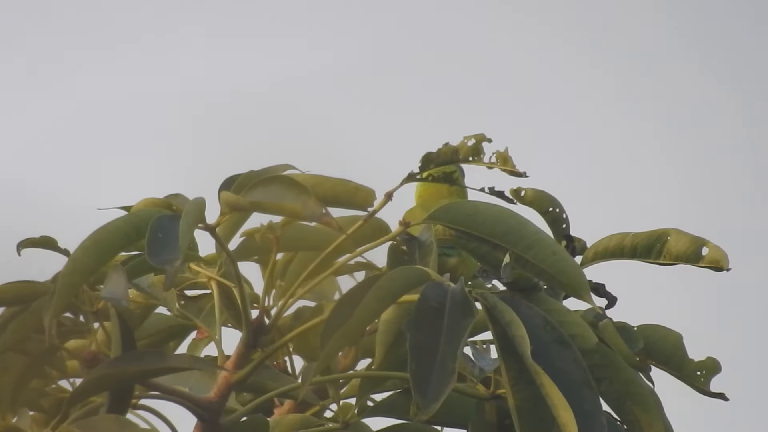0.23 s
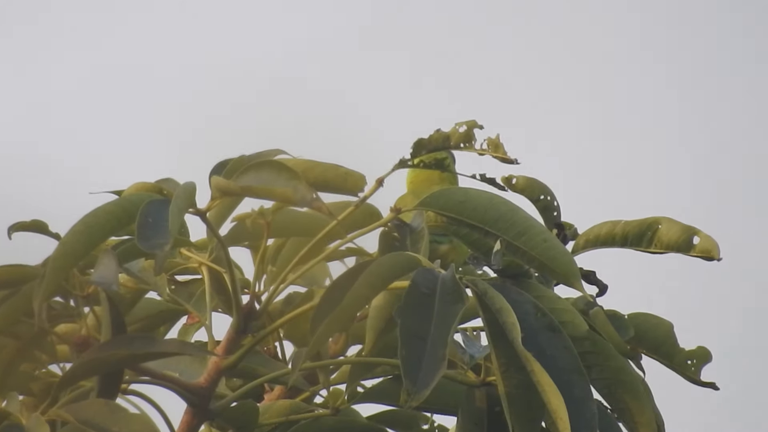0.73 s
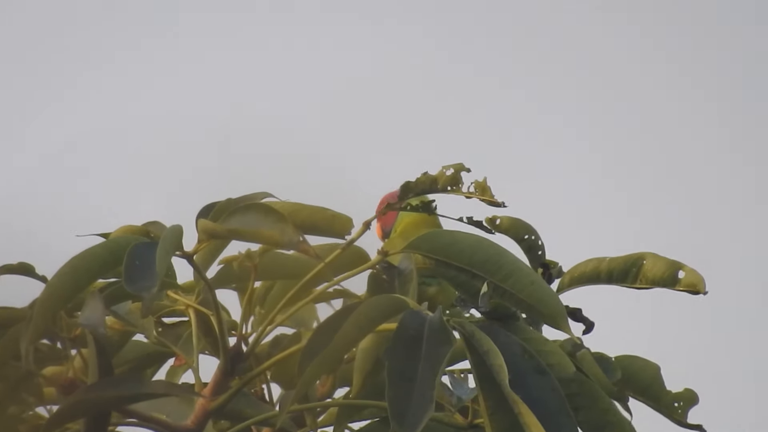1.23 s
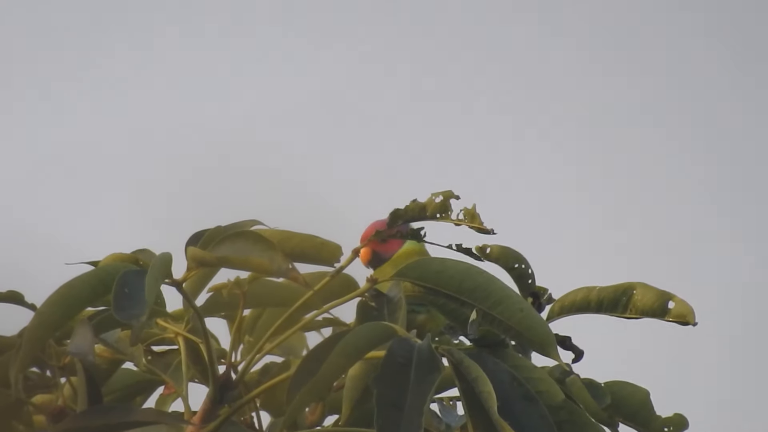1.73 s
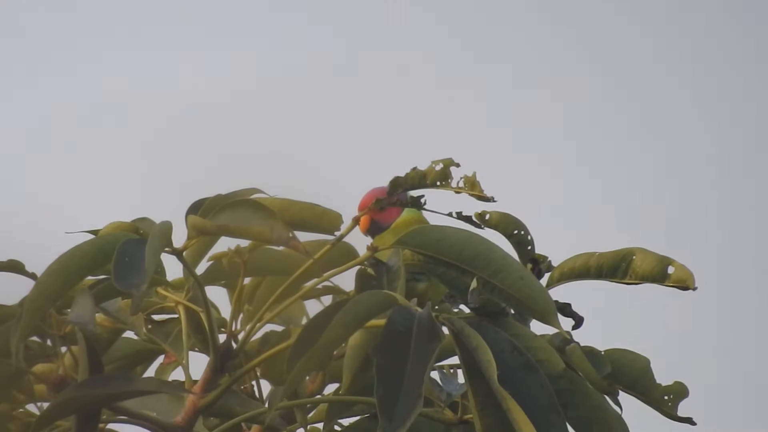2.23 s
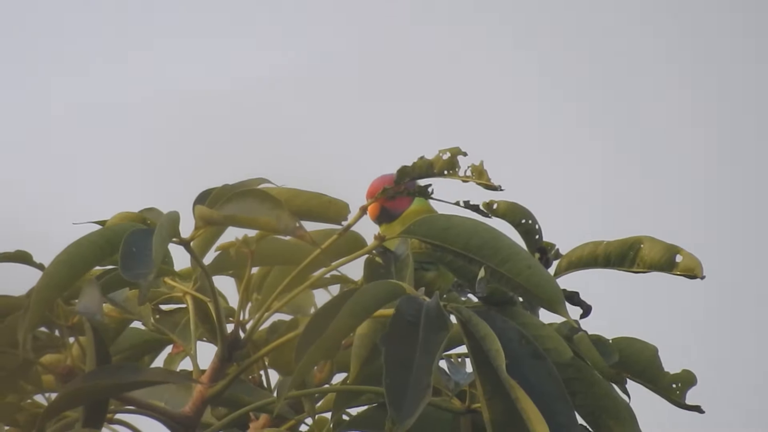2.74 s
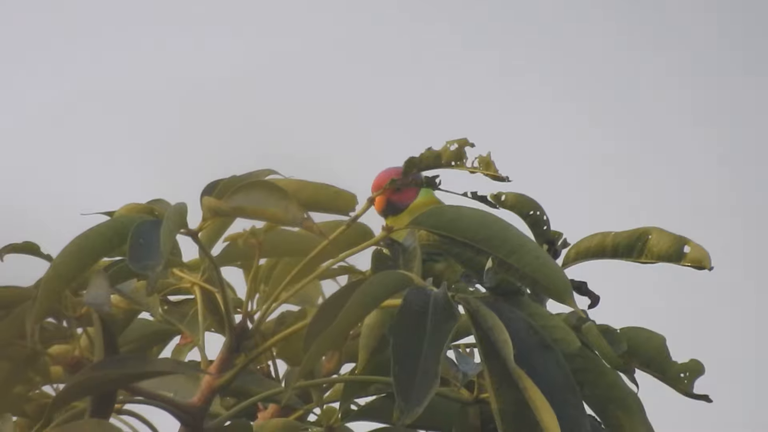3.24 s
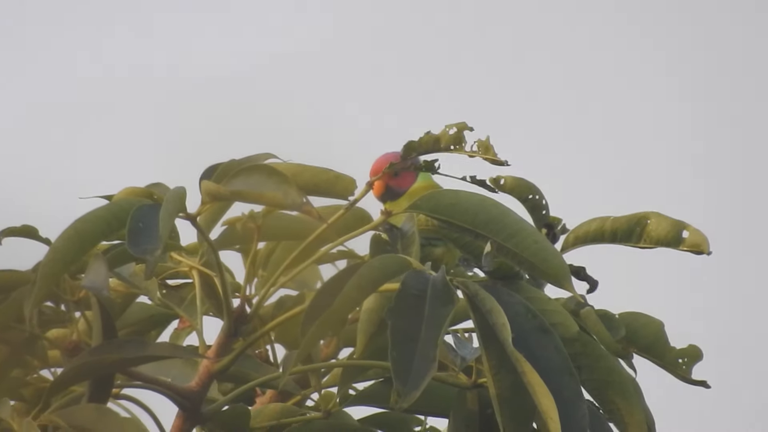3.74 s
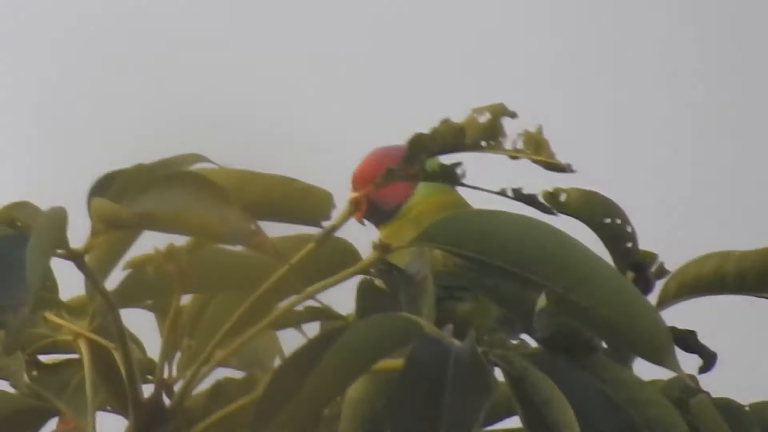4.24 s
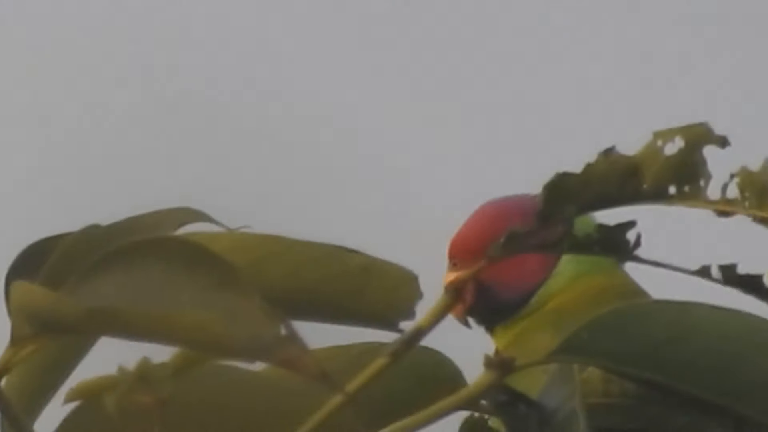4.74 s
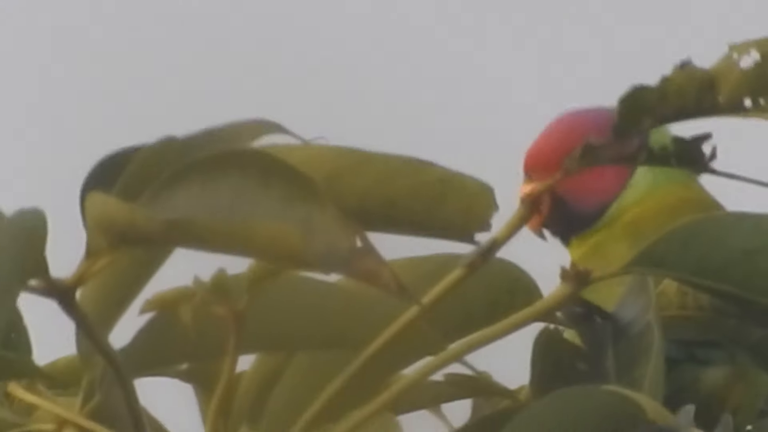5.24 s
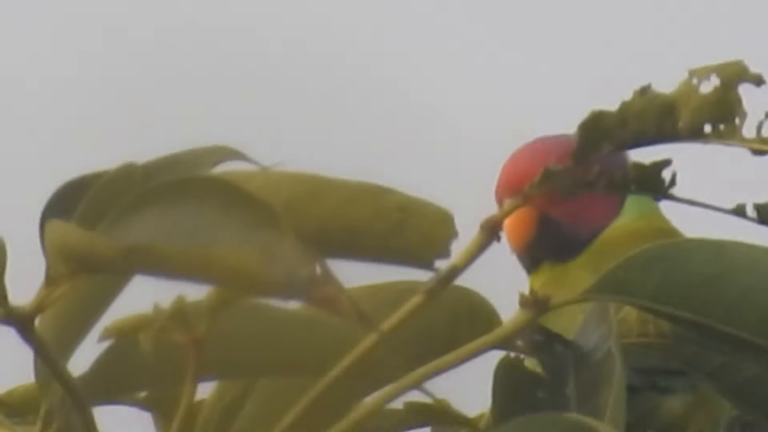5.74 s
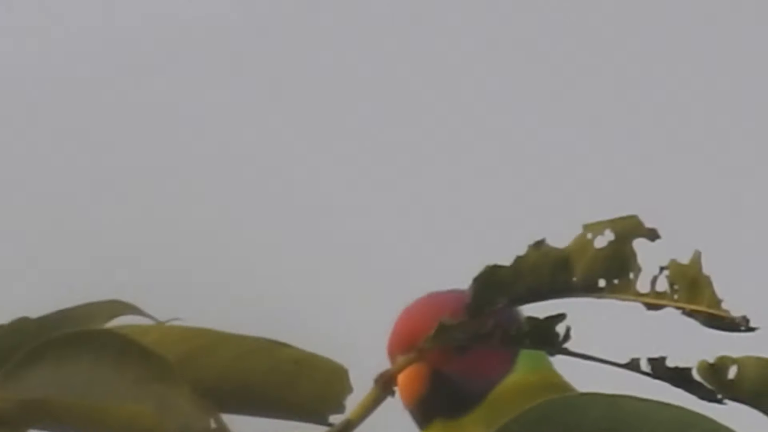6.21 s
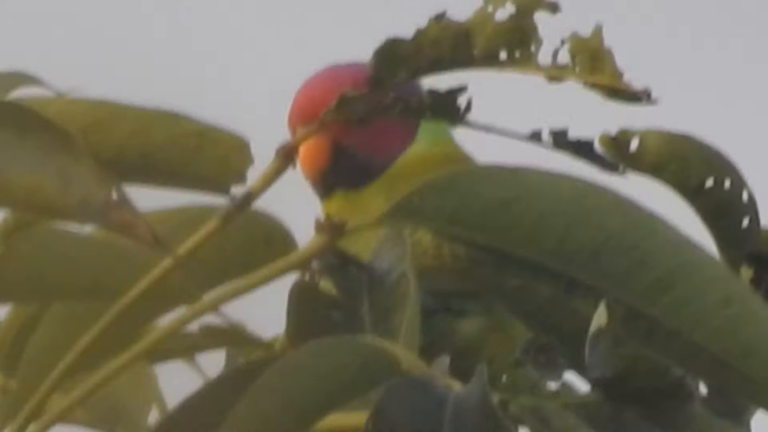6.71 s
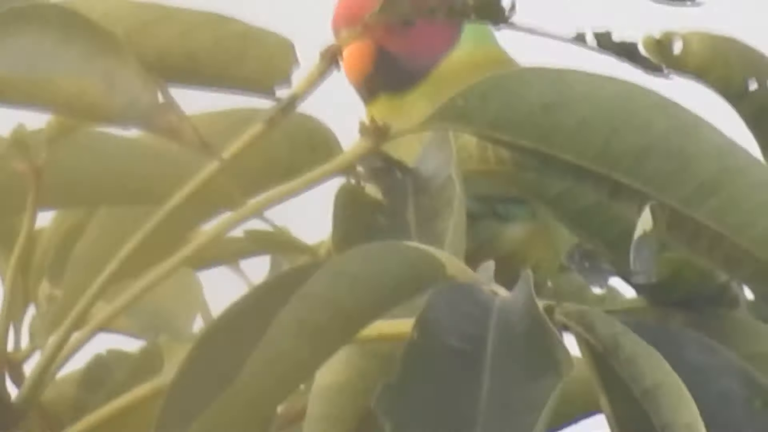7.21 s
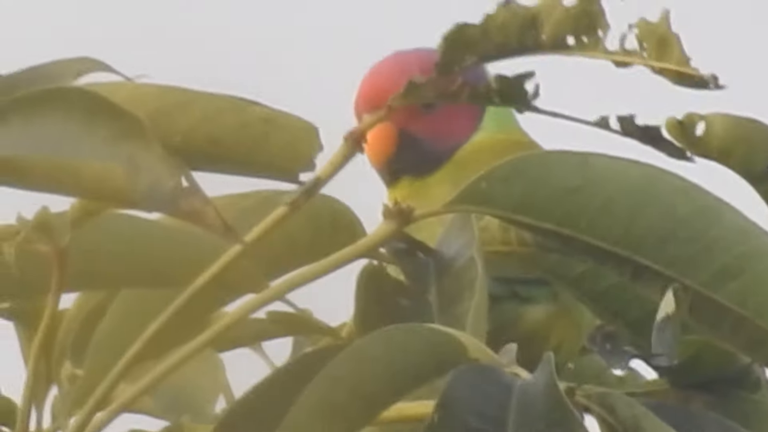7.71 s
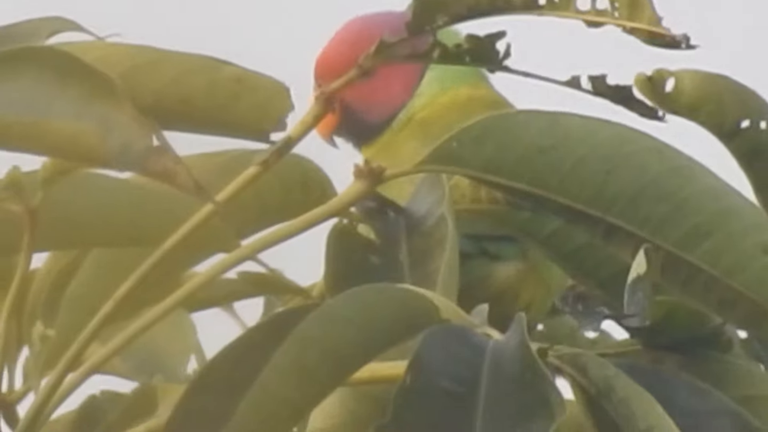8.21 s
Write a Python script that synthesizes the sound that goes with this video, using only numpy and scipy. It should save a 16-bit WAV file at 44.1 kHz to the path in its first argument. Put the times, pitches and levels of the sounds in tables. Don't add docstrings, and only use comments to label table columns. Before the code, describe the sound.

Outdoors at a treetop, small birds chirp and warble over insect hiss and low distant traffic. A close parakeet gives one very short rising shriek, then short-long pairs, loud and bright. Soft reedy and rasping notes come between, with a few dry twig ticks. Near the end a quick cluster of cries is answered by fainter calls farther off. Leaves scatter every call into a brief airy tail.

```python
import sys
import numpy as np
from scipy import signal
from scipy.fft import rfft, irfft, next_fast_len
from scipy.io import wavfile
from scipy.ndimage import uniform_filter1d, map_coordinates

SR = 44100
rng = np.random.default_rng(int(sys.argv[2]) if len(sys.argv) > 2 else 0)


def linear_from_db(decibels):
    return 10 ** (np.asarray(decibels, float) / 20)


def waveform_to_disk(signal):
    frames = np.transpose(np.atleast_2d(signal))
    scaled = np.clip(frames, -1, 1) * 32767
    samples = np.round(scaled).astype(np.int16)
    wavfile.write(sys.argv[1], SR, samples)


N = 373086

# (stage [0-4: sweep, climb, shriek, whistle], pitch [Hz], effort [dB])
SHORT_SHAPE = [(0, 885, -17.5), (1, 2345, -6), (1.97, 2966, -10), (2.03, 3279, -3), (2.7, 3742, -2.5),
               (2.98, 4218, -1.5), (3.03, 4880, -19.5), (3.27, 5420, -14), (4, 5496, -32)]
LONG_SHAPE = [(0, 933, -15.5), (1, 2390, 0.5), (1.97, 3007, -6.5), (2.03, 3370, -2), (2.72, 3834, 3.5),
              (2.98, 4193, 4.5), (3.03, 5010, 0), (3.19, 5386, -2.5), (4, 5490, -24)]
DRAWN_SHAPE = [(0, 928, -10), (1, 1697, -4), (1.5, 2170, -2), (1.97, 2745, -3.5), (2.05, 3400, -1.5),
               (2.97, 4310, -1), (3.05, 5100, -14), (3.4, 5520, -4.5), (4, 5550, -18)]
SCOOP_SHAPE = [(0, 1167, -0.5), (1, 1586, 0.5), (1.97, 2463, -1), (2.05, 3080, -1), (2.6, 3625, 3.5),
               (2.97, 4020, -0.5), (3.1, 5050, -11), (3.3, 5380, -7.5), (4, 5260, -25.5)]
FAR_SHAPE = [(0, 934, -5), (1, 2390, -5.5), (1.97, 3030, -2), (2.03, 3406, 2), (2.72, 3825, -1),
             (2.98, 4360, -1), (3.03, 5350, -4), (3.3, 5480, -9), (4, 5420, -13.5)]
# (start [s], first jump [s], second jump [s])
SHORT_CRIES = [
    (.458, .512, .568),
    (2.163, 2.216, 2.276),
    (3.867, 3.921, 3.978),
    (5.157, 5.213, 5.268),
    (6.216, 6.272, 6.325),
    (6.389, 6.445, 6.5),
]
LONG_CRIES = [
    (2.392, 2.443, 2.501),
    (4.115, 4.168, 4.227),
    (5.303, 5.351, 5.415),
    (6.41, 6.459, 6.522),
]
DRAWN_CRIES = [
    (6.636, 6.718, 6.745),
    (7.537, 7.623, 7.65),
]
SCOOP_CRIES = [
    (6.92, 6.966, 7.02),
    (7.216, 7.262, 7.315),
]
FAR_CRIES = [
    (7.232, 7.279, 7.323),
    (7.891, 7.936, 7.988),
]
# (opening sweep [s], closing whistle [s])
SHORT_ENDS_S = (.0187, .037)
LONG_ENDS_S = (.0175, .051)
DRAWN_ENDS_S = (.023, .06)
SCOOP_ENDS_S = (.026, .06)
FAR_ENDS_S = (.025, .06)
# (level [dB], pitch factor [-], whistle [dB])
SHORT_EFFORT = [(-12, 1.01, -1.5), (-11, 1, -0.5), (-11.5, 1.008, -0.5), (-11.5, 1.01, -0.6),
                (-13, 1.043, 2.5), (-10, 1.003, 0)]
LONG_EFFORT = [(-12, 0.997, 0.36), (-12, 1.004, -0.39), (-12.5, 0.992, -0.048), (-12, 1.003, 0.26)]
DRAWN_EFFORT = [(-34.5, .997, -0.35), (-32, 1.003, -1.5)]
SCOOP_EFFORT = [(-39, .997, 1.5), (-39.5, 1.003, 5.7)]
FAR_EFFORT = [(-37.5, 1, 2.5), (-40.5, .97, -0.5)]
# (frequency [Hz], gain [dB])
THROAT = [(900, -20.5), (2300, -19), (2800, -3), (3300, 1.5), (4400, -6.5), (5600, -4), (9000, -14),
          (16000, -75)]
FAR_THROAT = [(1000, -11), (2200, -10), (2800, -2), (3500, 0), (5200, -2), (6000, -15), (8000, -20),
              (16000, -40)]
# (partial 2 [dB], partial 3 [dB])
REGISTERS = [(-2, -7.5), (-13, -3), (-3.5, -5)]
FAR_REGISTERS = [(-1.5, -8), (-10, -19), (-10, -14)]
# (frequency [Hz], level [dB])
BREATH = [(300, -8), (1500, -6.5), (3500, -0.5), (7000, -2), (11000, -14), (16000, -15.5)]
PUFF = [(1500, -25), (2300, -6), (3200, 0), (4500, -9), (6600, -3), (8500, -14), (14000, -30)]
# (share of length [0-1], pitch [Hz], level [dB])
LEVEL_SHAPE = [(0, 1738, -7), (.04, 1621, 1.5), (.1, 1629, 4), (.3, 1718, 4), (.6, 1795, 2),
               (.95, 1827, -3.5), (1, 1960, -9)]
WAVY_SHAPE = [(0, 1210, -6.5), (.06, 1445, -1.5), (.14, 1510, -1), (.29, 1350, -2.5), (.41, 1540, -4),
              (.6, 1530, -9), (.93, 1600, -6), (1, 1540, -10)]
RASP_SHAPE = [(0, 880, -20), (.13, 990, -10), (.27, 1075, -5), (.45, 1100, -3), (.75, 1065, -8),
              (1, 1030, -18)]
HIGH_RASP_SHAPE = [(0, 960, -15), (.08, 1040, -7), (.22, 1095, -4), (.45, 1100, -3.5), (.7, 1070, -8),
                   (1, 1030, -16)]
# partials 1, 2, .. [dB]
LEVEL_TONE_DB = [-8, -4.5, -8, -9, -22.5, -29.5, -37]
WAVY_TONE_DB = [-8.5, -3, -7, -6, -12, -26.5]
RASP_TONE_DB = [-10, -2.5, -1, -10, -17, -23]
# (start [s], end [s], level [dB], pitch factor [-], trill depth [0-1])
LEVEL_NOTES = [(3.371, 3.529, -38, 0.968, 0.12), (3.729, 3.897, -36.5, 0.983, 0.18),
               (4.113, 4.291, -37, 1, 0.2), (4.505, 4.675, -36, .997, 0.1),
               (6.712, 6.876, -38.5, 0.965, 0.04), (7.085, 7.263, -36.5, 0.99, 0.15)]
WAVY_NOTES = [(3.005, 3.127, -40.5, 0.97, 0), (6.156, 6.268, -38.5, 0.96, 0)]
RASP_NOTES = [(5.716, 5.898, -36.5, .99, .9)]
HIGH_RASP_NOTES = [(2.58, 2.757, -39, 1.02, .8)]
# (start [s], end [s], middle pitch [Hz], glide [share of pitch], level [dB])
SLIDES = [(.045, .08, 2850, 0.23, -61), (.078, .105, 3430, .04, -54), (.099, .128, 3640, -0.37, -55),
          (.19, .213, 3280, 0.091, -38.5), (.466, .482, 2710, -0.15, -25), (.646, .668, 3090, 0.116, -32.5),
          (1.218, 1.32, 5500, -0.19, -61), (1.33, 1.354, 2034, .065, -54), (3.386, 3.407, 2530, 0.24, -51),
          (3.56, 3.573, 2130, 0.046, -50.5), (3.625, 3.636, 2270, -0.28, -49),
          (4.767, 4.795, 2540, -0.043, -46), (7.735, 7.755, 2550, -.06, -56), (7.879, 7.9, 3400, 0.17, -53),
          (7.877, 7.898, 1120, 0.14, -51), (.123, .131, 3300, .12, -52),
          (0.053, .11, 1690, 0.16, -63), (.363, .372, 1500, .3, -55), (0.621, 0.644, 2640, 0.042, -44),
         (1.243, 1.277, 2560, .01, -64), (1.754, 1.795, 2850, 0.018, -59),
         (1.768, 1.786, 2500, -0.089, -57), (1.775, 1.792, 1160, 0.05, -60),
         (1.89, 1.97, 1870, -0.011, -61), (1.9, 1.95, 1490, 0.048, -61), (1.93, 2.0, 2850, .01, -62),
         (2.788, 2.836, 2330, -0.037, -61), (2.885, 2.9, 1760, 0.066, -56), (3.7, 3.708, 2600, 0.086, -58),
         (4.291, 4.337, 1540, -0.006, -57), (4.68, 4.717, 2540, -0.0017, -60),
         (4.862, 4.887, 2570, -0.12, -57.5), (5.11, 5.126, 3380, 0.072, -53),
         (7.509, 7.522, 2900, 0.081, -60), (7.52, 7.544, 2510, .01, -51)]
SETTLES = [(.118, .177, 2530, 0.096, -49.5), (1.235, 1.277, 1700, -0.043, -55),
           (1.845, 1.895, 2170, 0.62, -55), (.613, .63, 1920, .6, -45.5), (2.831, 2.853, 1687, -0.021, -51),
           (2.96, 2.982, 1980, 0.022, -55), (3.47, 3.484, 2092, 0.22, -52), (3.709, 3.728, 1980, -0.3, -48),
           (4.032, 4.044, 1970, -0.029, -50), (4.893, 4.926, 2780, 0.11, -45),
           (4.949, 4.99, 2665, -0.11, -45), (5.538, 5.565, 1820, 0.28, -54),
           (5.59, 5.652, 2175, 0.0098, -49), (8.309, 8.42, 5870, 0.19, -58)]
FLICKS = [(.165, .182, 2650, 0.28, -49), (.246, .264, 2450, 0.59, -42.5), (.704, .724, 2375, 0.55, -36.5)]
ARCHES = [(.28, .301, 3915, 0.0025, -35.5), (.266, .309, 1445, 0.46, -47), (.443, .468, 2564, 0.1, -32),
          (3.167, 3.202, 2150, -0.16, -58), (1.96, 2.03, 3110, -0.035, -58),
          (2.1, 2.137, 1700, -0.18, -53.5), (2.381, 2.43, 2320, 0.027, -27.5),
          (2.547, 2.585, 2210, -0.18, -37), (4.71, 4.759, 2850, -0.076, -46.5),
          (4.735, 4.773, 3045, -0.15, -44), (4.917, 4.95, 3040, -0.18, -42), (7.492, 7.511, 2490, .03, -54)]
# (start [s], end [s], level [dB])
SEEPS = [(0.957, 1.051, -63), (3.165, 3.32, -62.5), (4.834, 4.928, -58.5), (5.125, 5.218, -56)]
# (start [s], end [s], middle pitch [Hz], level [dB], beat rate [1/s])
BUZZES = [(2.578, 2.664, 1780, -36.5, 151), (2.336, 2.39, 2480, -45.5, 200)]
SINKING = [(.76, .82, 4050, -62, 58), (2.356, 2.384, 2680, -44, 300), (3.05, 3.1, 5900, -63, 150),
           (.67, .685, 2100, -57, 210)]
RISING = [(0.3, .322, 3900, -48, 149), (.5, .57, 1640, -51.5, 91), (.735, .75, 2950, -49, 74),
          (5.05, 5.12, 2050, -53.5, 89)]
DEEP = [(.298, .336, 1870, -49.5, 103), (.75, .825, 3370, -58, 82.6)]
STEADY = [(4.514, 4.573, 6500, -54, 270), (0.23, .26, 3480, -49.5, 81), (.478, .522, 2500, -34, 97),
          (.668, .712, 3200, -48, 123), (.58, .612, 2550, -47, 60), (.736, .775, 4180, -51, 69),
          (0.35, .366, 3980, -54.5, 80), (2.662, 2.685, 1480, -50, 130)]
# (time [s], peak [dB], ring [Hz])
TICKS = [
    (0.935, -43, 360),
    (2.993, -36, 2020),
    (4.486, -44, 2500),
    (4.957, -35, 4390),
    (6.141, -31, 2680),
    (6.697, -38, 6550),
    (7.064, -34, 3520),
]
# (frequency [Hz], t60 [s])
GROVE = [(1000, 0.15), (4000, 0.43), (8000, 0.43), (14000, 0.073)]
# (delay [s], level [dB])
WALLS = [(.002, -11.5), (.012, -24), (.06, -29), (0.102, -45.5), (.16, -45)]
# (frequency [Hz], density [dB per Hz])
AIR = [(8.8, -30), (15, 0.5), (103, -12), (192, -14), (341, -20), (414, -21), (1400, -27), (2290, -31),
       (2500, -39), (3250, -54.5), (5500, -120)]
HISS = [(1200, -30.5), (2500, 1.5), (5000, -1.5), (6000, -1), (6900, 1), (7900, -5), (10000, -8),
        (13000, -10.5), (16000, -7)]
# (frequency [Hz], gain [dB])
MIC = [(100, -9), (9000, 3.5), (11500, 5), (12500, -19), (16000, -40.5)]
TOP = [(15650, 0), (15760, -90)]

TURN_DULLS = -1.6
FLUTTER_DB = 3
OPENING_DB = -3.2
OPENING_ROUGH = 5
STUMBLE_S, STUMBLE_DB, HOP_SHARE = .014, -9, .035
FAR_STEP_DB, FAR_JITTER = -15, .016
PUFF_DB, PUFF_HALF_S = -41, .008
TRILL_SHARE, TRILL_HZ, TRILL_DB = .062, 84, 1.3
SEEP_HZ, SEEP_GLIDE = 5870, -0.049
CHIRP_JITTER, CHIRP_SHIMMER_DB = .015, 2
NEAR_DB = -37
SINK, RISE, BUZZ_SINK = -.085, .07, -0.068
WARBLE, DEEP_WARBLE, STEADY_WARBLE, BUZZ_SWING = .055, .16, .025, 0.048
AIR_DB, AIR_SWELL_DB, HISS_DB, HISS_SWELL_DB = -47.18, .5, -55.5, 0.38
LOPSIDED_DB, CEILING = -25, .74


def cries(shape, ends_s, rows, efforts, throat, registers, dulls=0, rough=0, step_db=-11,
          jitter=0.0054, break_db=-20, opening_db=OPENING_DB, stumbles=0):
    track = np.zeros(N)
    stage, hz, effort_db = np.transpose(shape)
    whole = np.round(stage)
    beside_jump = np.abs(stage - whole) < .09
    stage = np.where(beside_jump, whole + .025 * np.sign(stage - whole), stage)
    for (start, first, second), (level_db, factor, whistle_db) in zip(rows, efforts):
        times = [start, start + ends_s[0], first, second, second + ends_s[1]]
        t = np.arange(times[0], times[-1], 1 / SR)
        at = np.interp(t, times, np.arange(len(times)))
        closed = np.clip(1 - at, 0, 1)
        gap_db = break_db * np.exp(-((t - second) / 0.0018) ** 2)
        catch_db = stumbles * STUMBLE_DB * np.exp(-((t - second + STUMBLE_S) / .0016) ** 2)
        effort = level_db + gap_db + catch_db + whistle_db * (t > second)
        effort = effort + np.interp(at, stage, effort_db)
        hop = stumbles * HOP_SHARE * np.clip((t - second + STUMBLE_S) / .003 + .5, 0, 1)
        pitch = np.where(t > second, 1, factor + hop) * np.interp(at, stage, hz)
        register_db = np.array(registers, float)[np.digitize(t, [first, second])].T
        source_db = [0, *uniform_filter1d(register_db, size=130)]
        levels = []
        for k, db in enumerate(source_db):
            beak_db = k * (dulls * whistle_db + k * opening_db * closed ** .5)
            flutter_db = (k > 0) * (t > first) * FLUTTER_DB * wobble(len(t), 129.3)
            throat_db = along(throat, (k + 1) * pitch)
            levels.append(effort + db + k * (catch_db + gap_db) + beak_db + flutter_db + throat_db)
        levels += [levels[-1] + step_db * k for k in (1, 2)]
        add(track, start, pitch, levels, jitter * (1 + rough * closed))
    return track


def near_cries():
    voice = (THROAT, REGISTERS, TURN_DULLS, OPENING_ROUGH)
    short = cries(SHORT_SHAPE, SHORT_ENDS_S, SHORT_CRIES, SHORT_EFFORT, *voice)
    long = cries(LONG_SHAPE, LONG_ENDS_S, LONG_CRIES, LONG_EFFORT, *voice, break_db=-11, stumbles=0.88)
    return short, long


def far_cries():
    voice = dict(throat=FAR_THROAT, registers=FAR_REGISTERS,
                 step_db=FAR_STEP_DB, jitter=FAR_JITTER, opening_db=0.1)
    drawn = cries(DRAWN_SHAPE, DRAWN_ENDS_S, DRAWN_CRIES, DRAWN_EFFORT, **voice)
    scoop = cries(SCOOP_SHAPE, SCOOP_ENDS_S, SCOOP_CRIES, SCOOP_EFFORT, break_db=1, **voice)
    return drawn + scoop + cries(FAR_SHAPE, FAR_ENDS_S, FAR_CRIES, FAR_EFFORT, **voice)


def throat_breath(voice):
    effort = np.abs(uniform_filter1d(np.abs(voice), size=500)) ** 0.62
    return linear_from_db(-28.5) * np.clip(effort - .02, 0, 1) * noise(BREATH)


def puffs():
    t = np.arange(N) / SR
    starts = [start for start, _, _ in SHORT_CRIES + LONG_CRIES]
    rush = sum(np.exp(-((t - start - PUFF_HALF_S) / PUFF_HALF_S) ** 2) for start in starts)
    return linear_from_db(PUFF_DB) * noise(PUFF) * rush


def notes(shape, tone_db, rows, fall_db=-5.0, shimmer_db=.5):
    track = np.zeros(N)
    share, hz, shape_db = np.transpose(shape)
    for start, end, level_db, factor, trill in rows:
        at = np.linspace(0, 1, round((end - start) * SR))
        depth = trill * np.clip(2.3 - 4 * at, 0, 1)
        turns = 2 * np.pi * TRILL_HZ * (end - start) * at
        shake = depth * np.sin(turns + 0.49 * wobble(len(at), 33.0))
        pitch = uniform_filter1d(np.interp(at, share, hz), size=200) * factor * (1 + TRILL_SHARE * shake)
        effort = level_db + np.interp(at, share, shape_db)
        levels = [effort + db + k * (fall_db * at + TRILL_DB * shake) for k, db in enumerate(tone_db)]
        add(track, start, pitch, levels, .0015 + .009 * depth, shimmer_db + 0.6 * depth)
    return track


def soft_notes():
    soft = notes(LEVEL_SHAPE, LEVEL_TONE_DB, LEVEL_NOTES)
    soft += notes(WAVY_SHAPE, WAVY_TONE_DB, WAVY_NOTES, fall_db=-6.0, shimmer_db=1.0)
    soft += notes(RASP_SHAPE, RASP_TONE_DB, RASP_NOTES, fall_db=-3.0, shimmer_db=0.68)
    return soft + notes(HIGH_RASP_SHAPE, RASP_TONE_DB, HIGH_RASP_NOTES, fall_db=-1.5, shimmer_db=.9)


def chirps(track):
    seeps = [(start, end, SEEP_HZ, SEEP_GLIDE, db) for start, end, db in SEEPS]
    kinds = [(SLIDES + seeps, -1, 1, 1), (SETTLES, 1, -.2, 1),
             (FLICKS, -.05, 1, 1.6), (ARCHES, 1, 1, 1)]
    for rows, first, last, late in kinds:
        for start, end, hz, glide, level_db in rows:
            u = np.linspace(-1, 1, round((end - start) * SR))
            bend = u * (last - first) / 2 + u * u * (first + last) / 2
            pitch = hz * (1 + glide * np.sign(bend) * np.abs(bend) ** late)
            levels = [level_db - 7 * u ** 2, level_db - 35.5 + 0 * u]
            add(track[int(level_db > NEAR_DB)], start, pitch, levels, CHIRP_JITTER, CHIRP_SHIMMER_DB)


def warbles(track):
    kinds = [(BUZZES, BUZZ_SINK, BUZZ_SWING), (SINKING, SINK, WARBLE), (RISING, RISE, WARBLE),
             (DEEP, SINK, DEEP_WARBLE), (STEADY, 0, STEADY_WARBLE)]
    for rows, glide, swing in kinds:
        for start, end, hz, level_db, rate_hz in rows:
            u = np.linspace(-1, 1, round((end - start) * SR))
            beat = np.sin(np.pi * rate_hz * (end - start) * u)
            pitch = hz * (1 + glide * u) * (1 + swing * beat)
            levels = [level_db - 5 * u ** 4 + 4 * beat]
            add(track[int(level_db > NEAR_DB)], start, pitch, levels, 0.34 * swing, 4.0)


def small_birds():
    track = np.zeros((2, N))
    chirps(track)
    warbles(track)
    return track


def ticks():
    track, t = np.zeros(N), np.arange(SR // 50) / SR
    for start, db, hz in TICKS:
        burst = .4 * np.sin(2 * np.pi * hz * t) + 0.89 * rng.standard_normal(len(t))
        track[round(start * SR):][:len(t)] += linear_from_db(db - 17.5 - 60 * t / 0.017) * burst
    return colour(track, [(300, 20.5), (7000, 17.0), (10000, -3)])


def grove(x, wet_db, walls_db):
    hz, t, z = signal.stft(rng.standard_normal(SR // 2), SR, nperseg=256)
    decay = linear_from_db(-60 * t / along(GROVE, hz)[:, None])
    tail = signal.istft(z * decay, SR, nperseg=256)[1]
    tail = linear_from_db(wet_db) * tail / np.linalg.norm(tail)
    for delay, db in WALLS:
        blur = rng.standard_normal(SR // 100) * np.hanning(SR // 100)
        tail[round(delay * SR):][:len(blur)] += linear_from_db(db + walls_db) * blur / np.linalg.norm(blur)
    return signal.fftconvolve(x, tail)[:N]


def background():
    traffic = linear_from_db(AIR_DB + AIR_SWELL_DB * wobble(N, 2.54)) * noise(AIR)
    return traffic + linear_from_db(HISS_DB + HISS_SWELL_DB * wobble(N, 3.2)) * noise(HISS)


def along(points, hz):
    f, v = np.transpose(points)
    return np.interp(np.log(hz + 1), np.log(f + 1), v)


def colour(x, spectrum):
    m = next_fast_len(N + SR // 10)
    gain = linear_from_db(along(spectrum, np.fft.rfftfreq(m, 1 / SR)))
    return irfft(rfft(x, m) * gain, m)[:N]


def noise(spectrum):
    x = colour(rng.standard_normal(N), spectrum)
    return x / np.std(x)


def wobble(n, rate_hz):
    return map_coordinates(rng.standard_normal(304), [np.arange(n) * rate_hz / SR], mode="wrap")


def add(track, start, hz, partial_db, jitter=.005, shimmer_db=1.05):
    n = len(hz)
    phase = 2 * np.pi * np.cumsum(hz * (1 + jitter * wobble(n, 500.4))) / SR
    tone = np.zeros(n)
    for k, db in enumerate(partial_db, 1):
        level = linear_from_db(db + k * shimmer_db * wobble(n, 308.3))
        tone += level * np.sin(k * phase) * (k * hz < SR / 2)
    fade = np.clip(np.minimum(np.arange(n), np.arange(n)[::-1]) / (0.002 * SR), 0, 1)
    track[round(start * SR):][:n] += np.sqrt(2) * tone * fade


def scene():
    short, long = near_cries()
    far, soft, small = far_cries(), soft_notes(), small_birds()
    breath = throat_breath(short + long + 1.17 * far)
    wet = grove(short, wet_db=-24.5, walls_db=-4.5)
    wet += grove(long + breath, wet_db=-24.5, walls_db=-4.5)
    wet += grove(soft, wet_db=-20.0, walls_db=-17)
    wet += grove(far, wet_db=-11, walls_db=-2.5)
    wet += grove(small[0], wet_db=-10.5, walls_db=4.0)
    wet += grove(small[1], wet_db=-11.5, walls_db=-4)
    calls = colour(short + long + far + small.sum(axis=0) + soft + wet, MIC)
    return (calls + breath + ticks() + background() + puffs())[None]


def band_limit(x):
    return signal.sosfilt(signal.butter(12, 15750, fs=SR, output="sos"), x)


def record(dry):
    difference = colour(dry[0] ** 2, [(70, -30), (150, -6), (500, 0), (900, 0), (2000, -25)])
    bent = dry[0] + linear_from_db(LOPSIDED_DB) * difference
    bent = bent / (1 + np.abs(bent / CEILING) ** 8) ** (1 / 8)
    return band_limit(colour(bent, TOP)[None])


dry = scene()
out = record(dry)
waveform_to_disk(out)
```